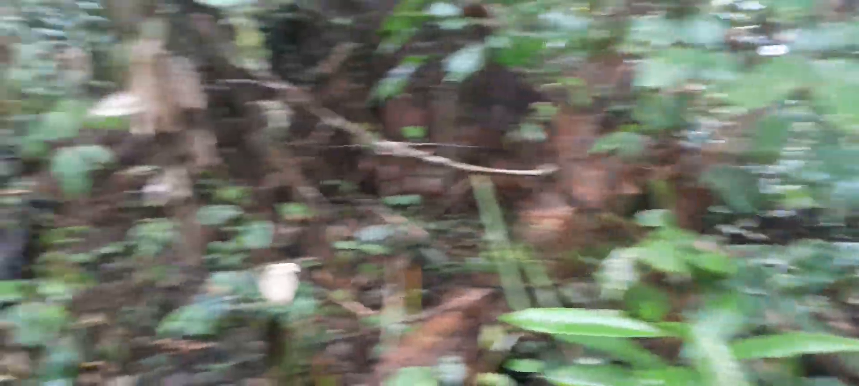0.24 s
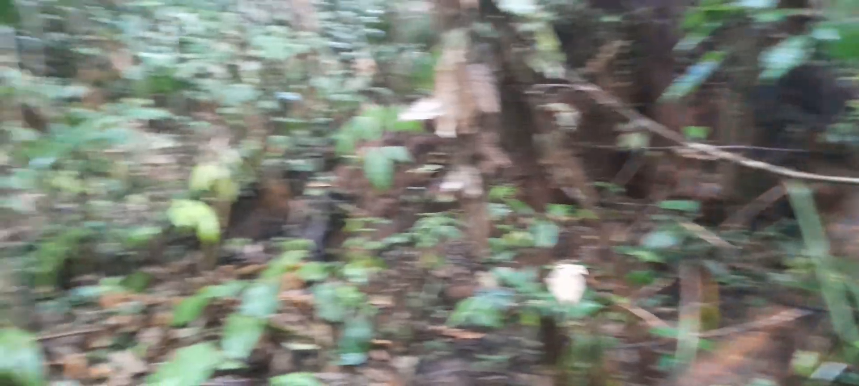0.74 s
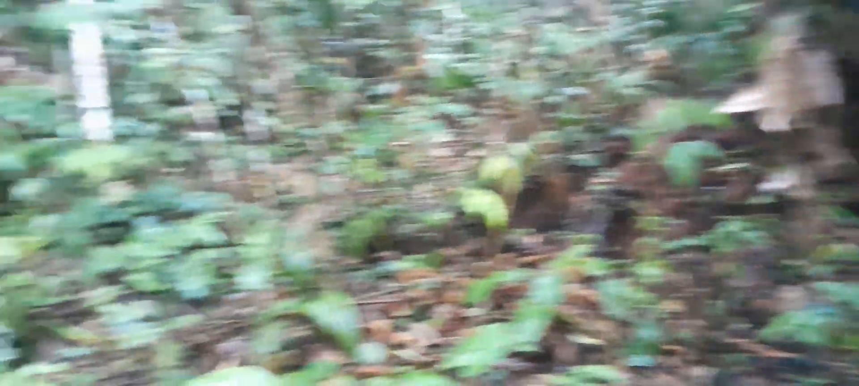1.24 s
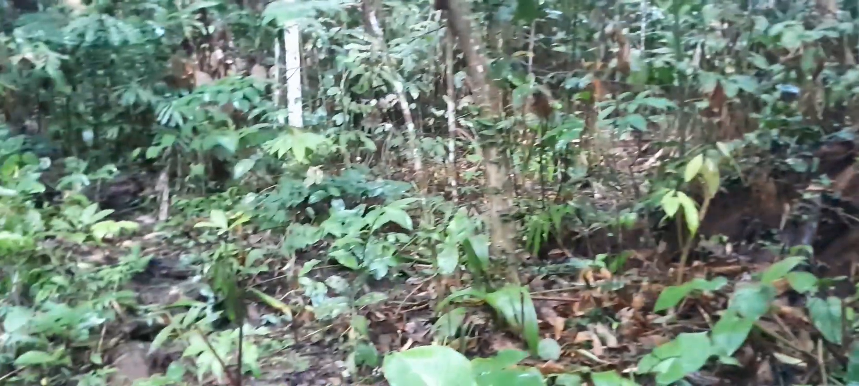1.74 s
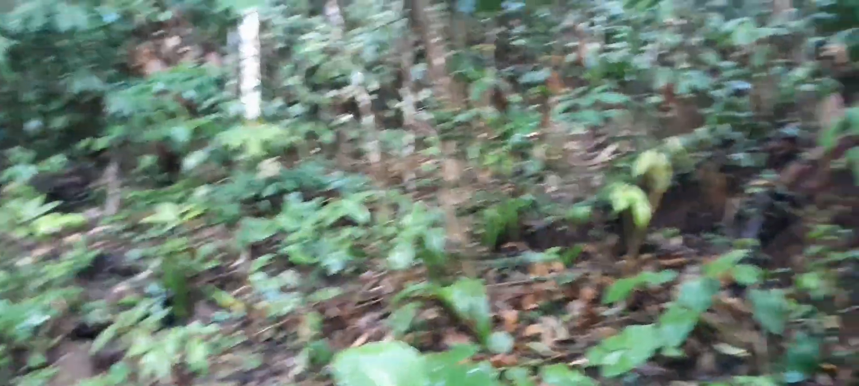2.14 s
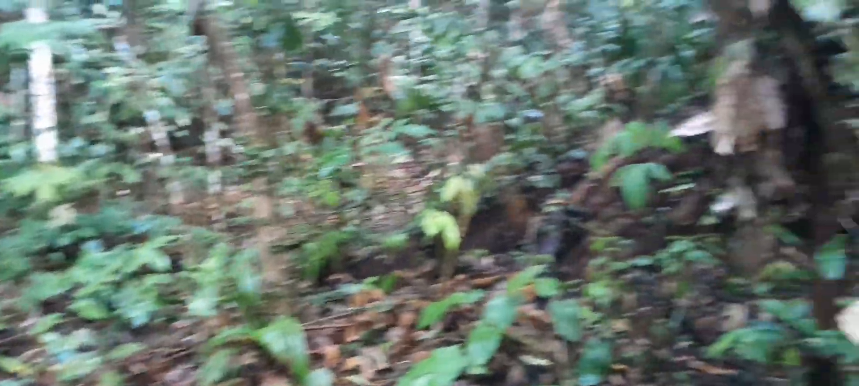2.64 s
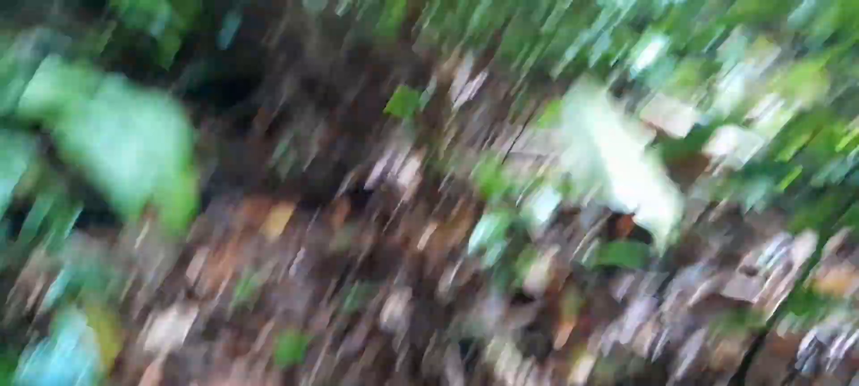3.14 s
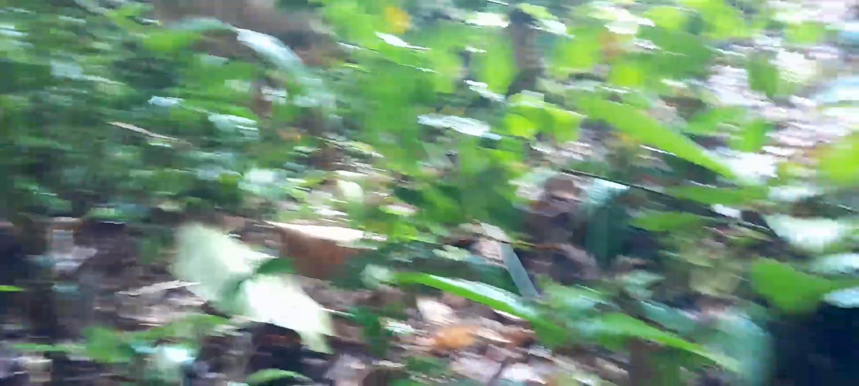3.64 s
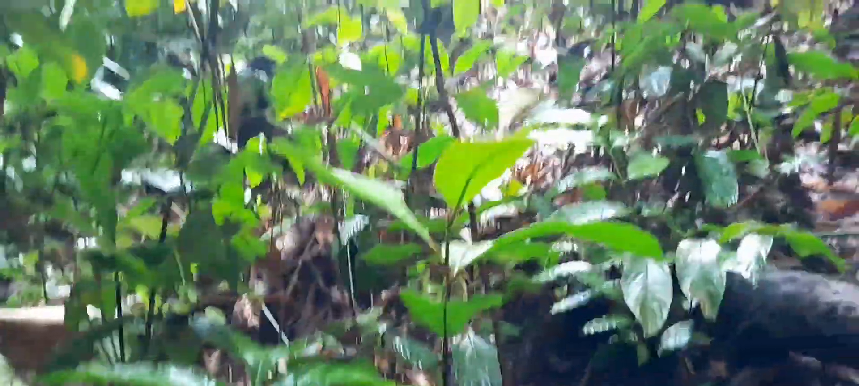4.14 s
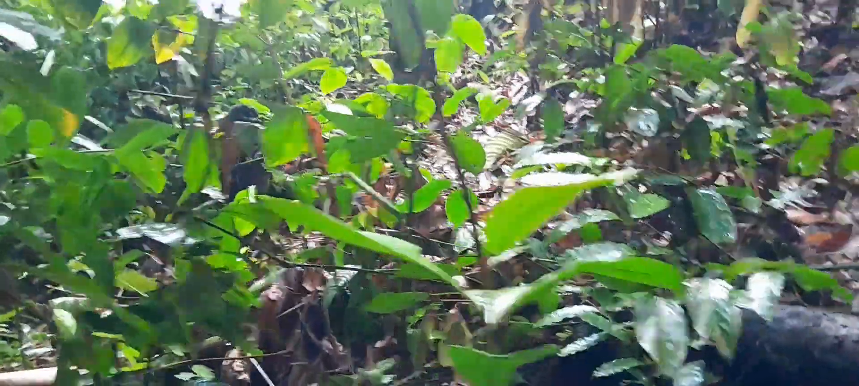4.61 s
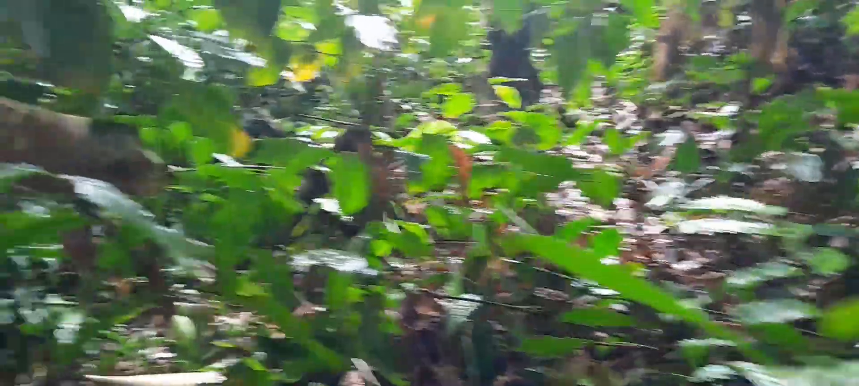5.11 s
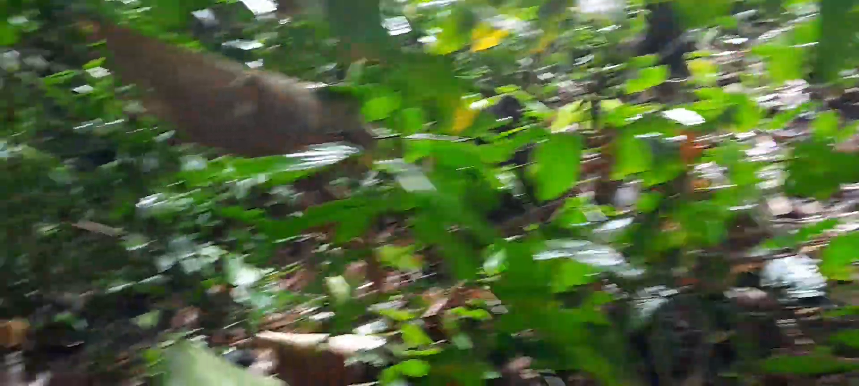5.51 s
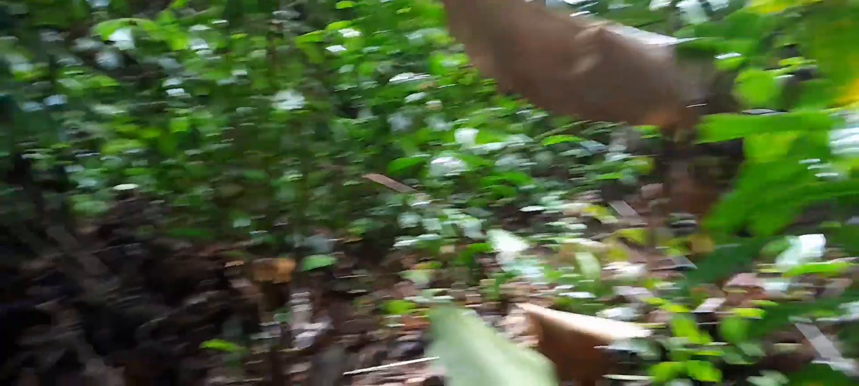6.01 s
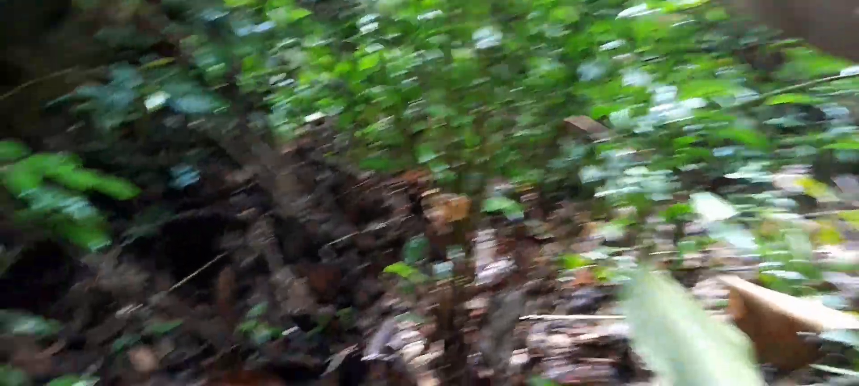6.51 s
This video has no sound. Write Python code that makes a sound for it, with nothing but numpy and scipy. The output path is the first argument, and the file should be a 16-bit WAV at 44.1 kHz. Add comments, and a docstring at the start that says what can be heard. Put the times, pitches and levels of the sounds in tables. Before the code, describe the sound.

Footsteps crunch through forest leaf litter amid droning insects and bird chirps, with a sharp microphone knock midway and a mosquito whining close by.

```python
"""An insect chorus drones in a tropical forest, where birds whistle and feet crush the leaf litter.
After a brief gap in the sound, something knocks on the left side of the microphone, setting its
casing into damped vibration. The steps are now nearer, a close cricket trills one tone for each
wing stroke, and a mosquito's wingbeat whines in and out of earshot.
Leaves scatter the calls, and the trunks return them as reverberation."""
import sys
import numpy as np
from scipy import signal
from scipy.fft import rfft, irfft, next_fast_len
from scipy.io import wavfile

SR = 44100
rng = np.random.default_rng(int(sys.argv[2]) if len(sys.argv) > 2 else 0)


def to_wav(sig):
    """Store sig (one row per channel, or 1-D mono) as 16-bit WAV at the path in sys.argv[1].

    Samples outside -1..1 are clipped; the rate is SR.
    """
    pcm = np.clip(np.atleast_2d(sig), -1, 1) * 32767
    pcm = np.round(pcm).astype(np.int16)
    wavfile.write(sys.argv[1], SR, pcm.T)  # frames by channels


N = 297939
TIME = np.arange(N) / SR
GAP_START_S, GAP_END_S = 2.918, 2.935
FOREST_T60_S, CUTOFF_HZ = 1, 15800

# Levels are relative, before each source's gain; pan_db is left minus right.
# Spectral density of the forest air: frequency_hz, before_gap_db, after_gap_db
AIR_SPECTRA = [(29.8, -3, -11), (60, 1, 4.5), (103, -1, 0.5), (168, -8, -10), (430, -14, -9.5),
               (740, -10, -15.5), (1090, -15.5, -19.5), (1900, -10, -8), (2540, -11, -17), (3160, -1.5, -9),
               (4360, -8, -24.5), (6800, -12, -12), (8300, -16, -22), (12900, -21, -18), (15200, -20, -15)]
# Bands of far insects: centre_hz, width_hz, before_gap_db, after_gap_db
CHORUS_BANDS = [(5632, 760, -64, -66), (7530, 720, -61, -57), (11340, 1450, -71, -70.5),
                (11200, 190, -78, -78)]
# Far crickets: pitch_hz, strokes_per_s, level_db
FAR_TRILLS = [(7530, 38, -63.5), (7490, 68, -68), (5620, 33, -78), (5730, 57, -69.5)]
# Swells of the thin cricket's note: centre_s, half_length_s, level_db
THIN_CRICKET_SWELLS = [(3.575, 0.069, -65), (4.036, 0.18, -65), (4.43, 0.045, -66), (4.584, .04, -68),
                       (4.78, 0.049, -66), (5.12, 0.064, -64.5), (5.362, 0.076, -65.5), (5.68, 0.088, -65),
                       (6.097, 0.17, -67.5), (6.384, 0.049, -67.5), (6.705, 0.13, -66)]
PHRASE_START_S, PHRASE_S, SAG_HZ_PER_S = 2.56, 1.16, 71
# Near cricket, swelling and fading as the microphone turns: time_s, level_db
CRICKET_LEVELS = [(2.94, -66), (3.25, -62.5), (3.5, -58), (3.85, -55.5), (4.35, -50), (4.8, -57),
                  (5.9, -60), (6.2, -91), (6.76, -106)]
REST_CENTRE_S, REST_HALF_LENGTH_S, REST_DB = 3.955, 0.04, -27   # it falters once

# Notes of the small bird: start_s, length_s, start_hz, end_hz, level_db
SMALL_BIRD_NOTES = [(.16, .13, 7700, 6830, -62), (1.42, 0.13, 7260, 6900, -62),
                    (3.77, 0.13, 6750, 5270, -62), (4.135, 0.063, 6980, 5310, -53.5),
                    (4.19, 0.043, 7580, 8020, -49), (4.295, .032, 7970, 8220, -41),
                    (4.51, 0.069, 6120, 5100, -50.5), (4.915, 0.046, 5340, 8280, -49),
                    (5.195, .046, 5730, 7670, -52), (5.368, .071, 6120, 8210, -51),
                    (5.56, 0.06, 6200, 7420, -54), (5.765, 0.049, 6830, 7420, -48.5),
                    (5.92, 0.017, 7590, 7730, -39.5), (6.27, 0.061, 5700, 4700, -57)]
# The far bird's high and low rising notes: delay_s, length_s, start_hz, end_hz
FAR_BIRD_NOTES = [(0, .17, 2980, 3214), (0.032, 0.1844, 2057, 2166)]
# Its calls: start_s, high_note_db, low_note_db
FAR_BIRD_CALLS = [(.365, -58, -62.5), (2.405, -61, -59)]
FALLING_RASP, OCTAVE_DB = 3.6, -23   # rasp multiplier of falling notes; a whistle's second harmonic

# Steps and shuffles in the litter: start_s, length_s, level_db, weight_offset_db, sweep_offset_db
FOOTFALLS = [(0, .3, -75.5, 4, -19), (0.43, 0.1, -75.5, -2, 3), (0.826, 0.034, -79.5, -8, 10),
             (1.027, .012, -75.5, 3, 9.5), (1.09, 0.023, -80, -12, 9.5), (1.377, .25, -72, -2.5, -5),
             (1.795, 0.028, -73.5, -12, 7.5), (2.053, 0.023, -70.5, 0, -4), (2.26, 0.036, -76, -15, 1),
             (2.59, 0.036, -76.5, -7, 12), (2.761, 0.0083, -69.5, -4.5, -4), (2.952, 0.16, -56, 7.5, -11.5),
             (3.249, 0.099, -61.5, 3, -5), (3.454, 0.11, -64.5, -1, -5.5), (3.86, 0.22, -71, -2, -6),
             (4.271, 0.19, -64.5, -5.5, -11), (4.545, .13, -61, -10.5, -4.5), (4.76, 0.11, -73.5, -20, 0),
             (4.998, 0.4, -75, -2.5, -13), (5.372, 0.0067, -59, -9, -9.5), (5.585, 0.013, -65, 0, -3.5),
             (5.694, 0.32, -64.5, -1.5, -8), (6.058, 0.15, -59, -2.5, -6), (6.27, 0.078, -62.5, -3, -3.5),
             (6.431, .025, -58.5, -3, -7), (6.597, 0.064, -56.5, 0, -6.5), (6.71, .05, -59, -10, -9)]
STEP_ATTACK_S, STEP_SETTLE_T60_S = 0.033, 0.46
ROLL_SHARE = 0.14   # part of a step's length in which the weight comes on
STIR_BEFORE_GAP_DB, STIR_AFTER_GAP_DB = -88.5, -78   # leaves keep stirring between steps
FAR_DULL_HZ = 6560   # steps before the gap are farther off and duller
# Spectrum of soft ground under load: frequency_hz, density_db
PRESS_SPECTRUM = [(100, -28.5), (220, -11), (400, -4), (720, -3.5), (1100, -8.5), (2000, -35)]
# Spectrum of crushed dry leaves: frequency_hz, density_db
CRUNCH_SPECTRUM = [(500, -13), (1100, -3.5), (1800, 2.5), (2800, -7.5), (4500, -12.5), (8000, -16.5)]
# Spectrum of swept plants: frequency_hz, density_db
SWISH_SPECTRUM = [(2500, -5), (5000, -2.5), (8000, 0), (10000, -6.5), (12500, -4.5), (15800, -7)]
# Hollow sticks and roots underfoot: start_s, level_db
STICK_STRIKES = [(0.259, -60), (1.013, -60), (2.074, -63), (2.642, -64), (5.034, -57), (5.368, -51.5),
                 (5.724, -49), (5.754, -49.5), (5.786, -49.5), (6.088, -61), (6.445, -57.5), (6.614, -52),
                 (6.643, -52.5)]
# Their modes: pitch_hz, level_db, t60_s
STICK_MODES = [(533, -6.5, 0.085), (652.4, 1, 0.14), (736, 2, 0.1), (935, -6.5, 0.15)]
# Twigs and dry leaves snapping: start_s, level_db, pan_db, treble_offset_db, pitch_hz
TWIG_SNAPS = [(.323, -53, 13, -5, 3320), (.469, -54, -4, -21, 3220), (1.014, -46, 11, -10, 3250),
              (1.025, -50, 8, -12, 3160), (1.389, -57, 6, -15, 3290), (1.55, -56, 6, -20, 1380),
              (1.605, -49, -2, 7, 4360), (1.794, -50.5, 7, -8, 3460), (2.074, -45, 20, -29, 3140),
              (2.269, -53, 3, -13, 3390), (2.762, -49.5, 1, -24, 2100), (3.085, -45, 20, -15, 1480),
              (3.254, -50, -6, -3, 1680), (3.34, -42, -7, -10, 1250), (3.365, -52, -1, -10, 2800),
              (3.398, -47, -11, -14, 1730), (3.49, -54, 19, 20.5, 1100), (3.537, -46.5, -2, -17, 1400),
              (4.606, -53, -8, -9, 1930), (4.722, -47, -4, -10, 1860), (4.782, -49.5, 2, -12, 3100),
              (5.368, -47.5, 3, -8, 2900), (5.587, -42, -3, 10, 1740), (6.089, -46, -12, -18, 1770),
              (6.305, -52, -10, -6, 4880), (6.429, -45, 2, -15, 3650), (6.643, -42.5, 5, -17, 1150),
              (6.735, -49, -4, -13, 3150)]

# Mosquito passes: start_s, length_s, arriving_wingbeat_hz, leaving_wingbeat_hz, level_db, pan_db
MOSQUITO_PASSES = [(2.92, 0.29, 504, 510.6, -45.5, 5), (3.17, 0.365, 505, 513.5, -49.5, 10),
                   (3.529, 0.082, 507, 459, -50, 6), (3.587, 0.079, 465, 459, -57, 10),
                   (3.798, 0.12, 383, 471, -59, 5), (4.166, 0.11, 467, 454, -55.5, -8),
                   (4.266, 0.23, 444, 427, -54, 2.5), (4.48, .15, 438, 416, -61.5, 0),
                   (5.554, 0.1, 384, 417, -60, 15), (5.814, .18, 440, 427, -58, 7),
                   (6.02, 0.34, 443, 452, -60, 9), (6.496, .16, 449, 432, -58.5, 7),
                   (6.67, 0.17, 503, 480, -59, 12)]
# Harmonics of the wingbeat: harmonic_number, level_db
WING_HARMONICS = [(1, 8.5), (2, -12), (3, -14.5), (4, -24)]
HOVER_DB, DART_PER_DB = -48, 0.48   # the wingbeat wavers more for each dB a pass lies below hovering

# Casing modes in the sharp knock: pitch_hz, level_db, t60_cycles
CASING_MODES = [(1490, -3, 2), (5440, -0.5, 5.4), (14800, -9.5, 10)]
KNOCK_S, KNOCK_PAN_DB, BUMP_T60_CYCLES = 3.0781, 47, 2
# Lighter bumps around the knock: start_s, level_db, pitch_hz, pan_db
CASING_BUMPS = [(2.76, -35.5, 566, 9), (2.938, -33, 350, 22), (3.001, -17.5, 1490, 27),
                (3.002, -13, 635, 29), (3.007, -25, 230, 19), (3.044, -17.5, 1850, 14),
                (3.053, -20, 1300, 25), (3.0647, -20, 1420, 18), (3.0682, -6, 1840, 21),
                (3.072, -16.5, 2400, 21), (3.0863, -8, 523, 24), (3.122, -23, 610, 5),
                (3.135, -28, 486, 29), (3.1512, -24.5, 770, 13), (3.332, -43, 590, 2)]
# Low thuds of the hand's grip: start_s, level_db, pitch_hz, t60_cycles, pan_db
GRIP_THUDS = [(2.761, -48, 58.6, 13, -21), (3.086, -23, 96.5, 3.45, 26)]
# Balance between the two microphone ports: frequency_hz, pan_db
PORT_BALANCE = [(300, 0.5), (900, 0.5), (1800, -5), (3200, 7), (4400, 1.5), (5500, -0.5), (7500, 0.5),
                (9000, -10.5), (10800, -11), (13500, -9), (15500, -12)]


def from_db(db):
    """Amplitude grows tenfold for every 20 dB."""
    return 10 ** (np.asarray(db) / 20)


def rms_one(x):
    """Normalisation to unit mean power."""
    return x / np.sqrt(np.mean(x ** 2) + 1e-20)


def panned(x, pan_db):
    """A level difference between left and right, at constant total power."""
    ratio = from_db(pan_db)
    return np.array([x * ratio, x]) * np.sqrt(2 / (1 + ratio ** 2))


def add(out, start_s, sound):
    """Superposition: a sound adds to those already present."""
    i = round(start_s * SR)
    out[:, i:i + sound.shape[-1]] += sound[..., :N - i]


def band(x, low_hz, high_hz):
    """Butterworth band-pass filtering."""
    sections = signal.butter(2, [low_hz, min(high_hz, .45 * SR)], "band", fs=SR, output="sos")
    return signal.sosfilt(sections, x)


def coloured(x, spectrum):
    """Spectral shaping by rows of frequency_hz, density_db; the result has unit rms."""
    hz, db = np.transpose(spectrum)
    size = next_fast_len(N)
    f = np.maximum(np.fft.rfftfreq(size, 1 / SR), 1)
    skirts = np.minimum(f / hz[0], 1) ** 2 * np.minimum(hz[-1] / f, 1) ** 2
    gain = from_db(np.interp(np.log(f), np.log(hz), db)) * skirts
    return rms_one(irfft(rfft(x, size) * gain, size)[..., :N])


def drift(knots_per_s):
    """Random modulation: straight lines join Gaussian values of unit spread."""
    knots = rng.standard_normal(4000)
    return np.interp(TIME * knots_per_s, np.arange(len(knots)), knots)


def echoes(x, t60_s, samples):
    """Dense reflections act as convolution with decaying noise, different at each ear."""
    response = rng.standard_normal((2, samples)) * from_db(-60 * TIME[:samples] / t60_s)
    response /= np.sqrt(np.sum(response ** 2) / 2)
    return signal.fftconvolve(x, response, axes=1)[:, :N]


def forest(x, wet_db):
    """Reverberation: echoes from trunks and leaves follow the direct sound."""
    wet = from_db(wet_db)
    return (x + wet * echoes(x, FOREST_T60_S, SR)) / np.sqrt(1 + wet ** 2)


def thicket(x, scatter_t60_s, direct_db):
    """Multiple scattering: intervening leaves split a sound into many close arrivals."""
    direct = from_db(direct_db)
    return (direct * x + echoes(x, scatter_t60_s, SR // 4)) / np.sqrt(1 + direct ** 2)


def air(level_db, after_gap_db):
    """Broadband ambient noise: soft rumble and the hiss of far foliage."""
    white = rng.standard_normal((2, N))
    before, after = (coloured(white, np.array(AIR_SPECTRA)[:, [0, column]]) for column in (1, 2))
    noise = np.where(TIME < GAP_START_S, before, after * from_db(after_gap_db))
    return noise * from_db(level_db + 0.075 * drift(27))


def chorus(flicker_db):
    """Incoherent summation: many far insects merge into narrow, shimmering bands of noise."""
    out = np.zeros((2, N))
    for hz, width_hz, before_db, after_db in CHORUS_BANDS:
        edges = hz - width_hz / 2, hz + width_hz / 2
        voices = rms_one(band(band(rng.standard_normal((2, N)), *edges), *edges))
        level_db = np.where(TIME < GAP_START_S, before_db, after_db)
        out += voices * from_db(level_db + flicker_db * drift(60))
    return out


def trill(pitch_hz, sweep_hz, strokes_per_s, wander_hz):
    """Stridulation: each wing stroke sounds one short falling tone, while the pitch slowly drifts."""
    age_s = (TIME - 4.0495) % (1 / strokes_per_s)
    stroke = np.minimum(age_s * strokes_per_s / .68, 1)   # sounds for 68% of each period
    wander = np.cumsum(wander_hz * drift(8.8)) / SR
    phase = 2 * np.pi * (age_s * (pitch_hz + sweep_hz * (1 - stroke) / 2) + wander)
    return rms_one(np.sin(np.pi * stroke ** 0.75) * np.sin(phase)) * from_db(2.9 * drift(40))


def far_crickets(sweep_hz, wander_hz):
    """Scattering in the undergrowth blurs the pulses of distant trills."""
    songs = sum(trill(hz, sweep_hz, rate, wander_hz) * from_db(db) for hz, rate, db in FAR_TRILLS)
    return thicket(panned(songs, 0), scatter_t60_s=0.066, direct_db=-8)


def thin_cricket(pitch_hz, wander_hz, gain_db, flicker_db, pan_db):
    """Amplitude and frequency modulation: one wavering note swells, and sags through each phrase."""
    age_s = (TIME - PHRASE_START_S) % PHRASE_S
    hz = pitch_hz - SAG_HZ_PER_S * age_s + wander_hz * drift(90)
    tone = np.sin(2 * np.pi * np.cumsum(hz) / SR)
    swells = sum(from_db(db) * np.exp(-((TIME - centre_s) / half_s) ** 2 / 2)
                 for centre_s, half_s, db in THIN_CRICKET_SWELLS)
    song = tone * swells * from_db(gain_db + flicker_db * drift(30))
    return forest(panned(song, pan_db), wet_db=-1.5)


def near_cricket(pitch_hz, sweep_hz, strokes_per_s, wander_hz, gain_db, pan_db):
    """Stridulation at close range, heard after the gap: direct sound outweighs reverberation."""
    level_db = np.interp(TIME, *np.transpose(CRICKET_LEVELS))
    rest_db = REST_DB * np.exp(-((TIME - REST_CENTRE_S) / REST_HALF_LENGTH_S) ** 2)
    song = trill(pitch_hz, sweep_hz, strokes_per_s, wander_hz) * from_db(level_db + rest_db + gain_db)
    return forest(panned(song * (TIME > GAP_START_S), pan_db), wet_db=-13)


def bird(notes, rasp_hz, scatter_t60_s, direct_db, wet_db, pan_db):
    """Rapid frequency modulation roughens gliding whistles, which scatter and reverberate."""
    out, quaver = np.zeros((2, N)), drift(700)
    for start_s, length_s, start_hz, end_hz, db in notes:
        along = np.linspace(0, 1, round(length_s * SR))
        depth_hz = rasp_hz * (FALLING_RASP if end_hz < start_hz else 1)
        glide_hz = start_hz + (end_hz - start_hz) * along
        phase = 2 * np.pi * np.cumsum(glide_hz + depth_hz * quaver[round(start_s * SR):][:len(along)]) / SR
        tone = np.sin(phase) + from_db(OCTAVE_DB) * np.sin(2 * phase)
        swell = np.sqrt(np.abs(np.sin(np.pi * along)))
        add(out, start_s, panned(2 * from_db(db) * swell * tone, pan_db))
    return forest(thicket(out, scatter_t60_s, direct_db), wet_db)


def far_bird():
    """Strong reverberation places a repeated two-note call deep among the trees."""
    notes = [(start_s + delay_s, length_s, start_hz, end_hz, db) for start_s, *levels in FAR_BIRD_CALLS
             for (delay_s, length_s, start_hz, end_hz), db in zip(FAR_BIRD_NOTES, levels)]
    return bird(notes, rasp_hz=73.6, scatter_t60_s=0.28, direct_db=0, wet_db=-3, pan_db=4.5)


def grains(per_s, spread_db, rub_db):
    """Shot noise: tiny leaf fractures come in clumps over a smooth rub."""
    fractures = rng.random(N) < per_s * from_db(4 * drift(40)) / SR
    sizes = from_db(spread_db * np.minimum(rng.exponential(1, N), 4))
    crackle = rms_one(fractures * sizes * rng.standard_normal((2, N)))
    return crackle + from_db(rub_db) * rng.standard_normal((2, N))


def tread(length_s):
    """Loading and relaxation: the foot rolls down and bears on the leaves, then they settle."""
    t = TIME[:SR]
    rise = np.minimum(t / (STEP_ATTACK_S + ROLL_SHARE * length_s), 1)
    return rise * from_db(-60 * np.maximum(t - STEP_ATTACK_S - length_s, 0) / STEP_SETTLE_T60_S)


def steps(press_db, crunch_db, swish_db, brush_pan_db, near_pan_db, uneven_db):
    """Feet press soft ground, crush leaves and sweep plants; these incoherent noises add in power."""
    far = TIME < GAP_START_S
    power = np.ones((3, 1)) * from_db(np.where(far, STIR_BEFORE_GAP_DB, STIR_AFTER_GAP_DB)) ** 2
    for start_s, length_s, db, weight_db, sweep_db in FOOTFALLS:
        strengths = from_db([[db + weight_db], [db], [db + sweep_db]])
        add(power, max(start_s - STEP_ATTACK_S, 0), (strengths * tread(length_s)) ** 2)
    pressing, crushing, sweeping = np.sqrt(power) * from_db(uneven_db * drift(45))
    press = coloured(grains(700, 4.3, -6.5), PRESS_SPECTRUM) * pressing * from_db(press_db)
    crunch = coloured(grains(1200, 5.7, 5.6), CRUNCH_SPECTRUM) * crushing * from_db(crunch_db)
    swish = coloured(grains(2500, 13, 8.2), SWISH_SPECTRUM) * sweeping * from_db(swish_db)
    swish = np.where(far, signal.lfilter(*signal.butter(2, FAR_DULL_HZ, fs=SR), swish), swish)
    brushing_left = TIME < 3.13
    pan_db = np.where(brushing_left, brush_pan_db, near_pan_db) * ~far
    return (press + crunch) * panned(np.ones(N), pan_db) + swish


def clunks(gain_db):
    """Modal vibration: trodden sticks ring dully, each mode varying in strength and tuning."""
    out, t = np.zeros((2, N)), TIME[:SR // 5]
    for start_s, db in STICK_STRIKES:
        for hz, mode_db, t60_s in STICK_MODES:
            strength, detune = from_db(rng.normal(mode_db, 1.7, (2, 1))), rng.normal(1, 0.037)
            decay = from_db(db + gain_db - 60 * t / t60_s)
            add(out, start_s, strength * np.sin(2 * np.pi * hz * detune * t) * decay)
    return forest(out, wet_db=-7.5)


def snaps(crack_t60_s, settle_db, settle_t60_s, gain_db, treble_gain_db):
    """Brittle fracture: a crack coloured by the size of the twig, then the leaves around it settle."""
    out, t = np.zeros((2, N)), TIME[:SR // 5]
    fade = from_db(-60 * t / crack_t60_s) + from_db(settle_db - 60 * t / settle_t60_s)
    for start_s, db, pan_db, treble_db, hz in TWIG_SNAPS:
        white = rng.standard_normal((2, len(t)))
        body = rms_one(band(white, hz / 1.77, hz * 1.52))
        edge = rms_one(band(white, 4500, 13000)) * from_db(treble_db + treble_gain_db)
        add(out, start_s, (body + edge) * panned(fade * from_db(db + gain_db), pan_db))
    return out


def mosquito(waver, flutter_db, gain_db):
    """Periodic wingbeats radiate a harmonic series that glides, swells and fades with each pass."""
    out, wobble = np.zeros((2, N)), waver * drift(45)
    for start_s, length_s, start_hz, end_hz, level_db, pan_db in MOSQUITO_PASSES:
        first = round(start_s * SR)
        along = np.linspace(0, 1, round(length_s * SR))[:N - first]
        darting = (1 + DART_PER_DB * max(HOVER_DB - level_db, 0)) * wobble[first:][:len(along)]
        wingbeat_hz = (start_hz + (end_hz - start_hz) * along) * (1 + darting)
        phase = 2 * np.pi * np.cumsum(wingbeat_hz) / SR
        tone = rms_one(sum(from_db(db) * np.sin(number * phase) for number, db in WING_HARMONICS))
        swell = np.abs(np.sin(np.pi * along)) ** 0.53   # a small exponent flattens the top
        add(out, start_s, panned(tone * swell * from_db(level_db + gain_db), pan_db))
    return thicket(out * from_db(flutter_db * drift(35)), scatter_t60_s=0.27, direct_db=10)


def knocks(scuff_db, scuff_t60_s):
    """Impact excitation: each contact gives a heavily damped swing of the casing and a short scuff."""
    out, t = np.zeros((2, N)), TIME[:SR // 4]
    knock = [(KNOCK_S, (-1) ** k * from_db(db), hz, cycles, KNOCK_PAN_DB)
             for k, (hz, db, cycles) in enumerate(CASING_MODES)]   # adjacent modes swing opposite ways
    bumps = [(s, from_db(db), hz, BUMP_T60_CYCLES, pan_db) for s, db, hz, pan_db in CASING_BUMPS]
    thuds = [(s, from_db(db), hz, cycles, pan_db) for s, db, hz, cycles, pan_db in GRIP_THUDS]
    for start_s, strength, hz, cycles, pan_db in knock + bumps + thuds:
        swing = -np.sin(2 * np.pi * hz * t) * from_db(-60 * t * hz / cycles)
        scuff = rms_one(band(rng.standard_normal(len(t)), hz / 2, hz * 2))
        scuff *= from_db(scuff_db - 60 * t / scuff_t60_s)
        add(out, start_s, panned(strength * band(swing + scuff, hz / 4, hz * 2.17), pan_db))
    return out


def ports(x):
    """Each microphone port colours airborne sound with its own frequency response."""
    hz, balance_db = np.transpose(PORT_BALANCE)
    size = next_fast_len(N + SR // 10)
    f = np.maximum(np.fft.rfftfreq(size, 1 / SR), 1)
    gain = panned(np.ones(len(f)), np.interp(np.log(f), np.log(hz), balance_db))
    return irfft(rfft(x, size) * gain, size)[:, :N]


def scene():
    """Airborne sound enters by the ports; the structure-borne knocks come through the casing."""
    insects = chorus(flicker_db=1.1) + far_crickets(sweep_hz=268, wander_hz=25.05)
    insects += thin_cricket(pitch_hz=3198, wander_hz=13.65, gain_db=2, flicker_db=3.5, pan_db=-2.5)
    insects += near_cricket(pitch_hz=7373, sweep_hz=166, strokes_per_s=43.45, wander_hz=12.23,
                            gain_db=4.5, pan_db=-19)
    birds = bird(SMALL_BIRD_NOTES, rasp_hz=111.3, scatter_t60_s=0.55, direct_db=-9, wet_db=-8, pan_db=3.5)
    birds += far_bird()
    litter = steps(press_db=3, crunch_db=2, swish_db=11, brush_pan_db=11, near_pan_db=-2, uneven_db=2.65)
    litter += clunks(gain_db=-4.5)
    litter += snaps(crack_t60_s=0.0094, settle_db=-20, settle_t60_s=0.28, gain_db=4, treble_gain_db=-10)
    airborne = air(level_db=-63, after_gap_db=-0.5) + insects + birds + litter
    airborne += mosquito(waver=0.0062, flutter_db=2.64, gain_db=-2)
    return ports(airborne) + knocks(scuff_db=-39.5, scuff_t60_s=0.17)


def record(dry):
    """Band limiting removes the deepest bass and the top; the sound drops out for an instant."""
    lean = signal.sosfilt(signal.butter(2, 40, "high", fs=SR, output="sos"), dry)
    gap = (TIME > GAP_START_S) & (TIME < GAP_END_S)
    return signal.sosfilt(signal.ellip(10, .1, 80, CUTOFF_HZ, fs=SR, output="sos"), lean * ~gap)


dry = scene()
out = record(dry)
to_wav(out)
```